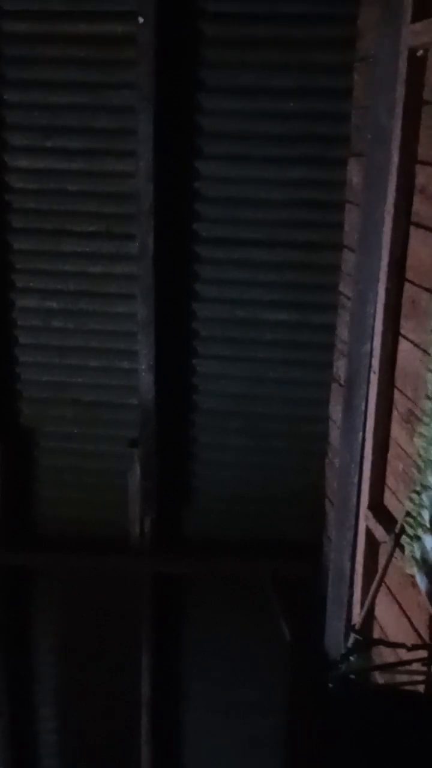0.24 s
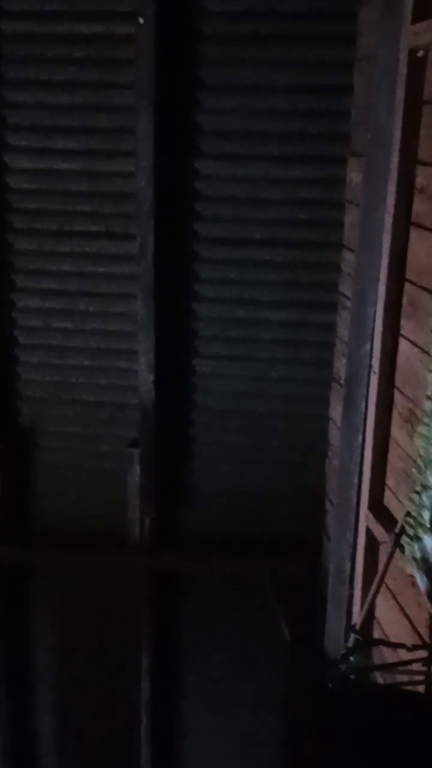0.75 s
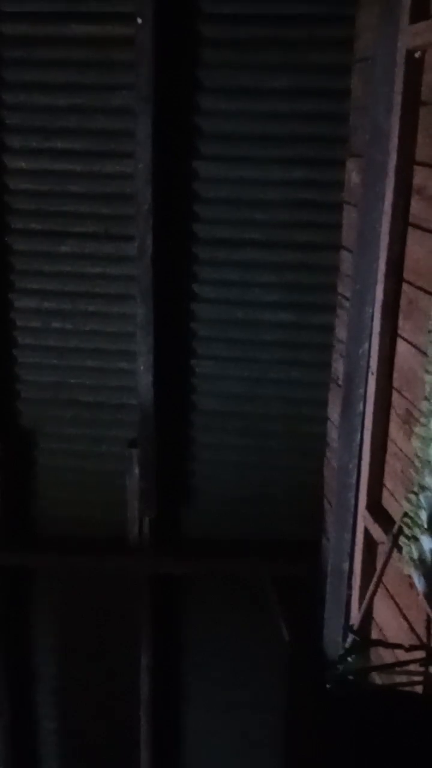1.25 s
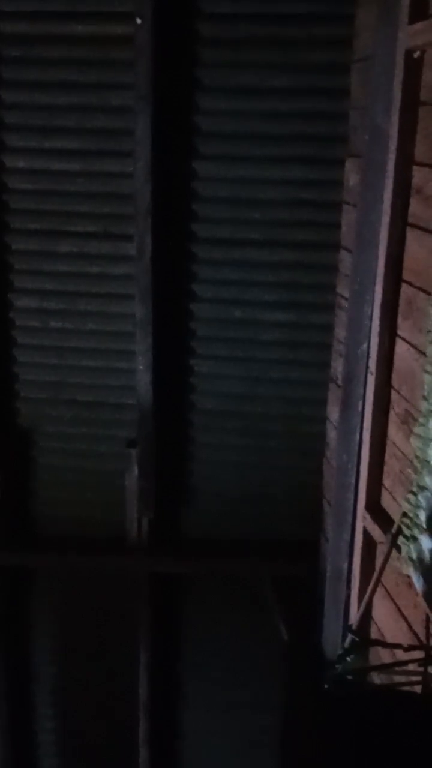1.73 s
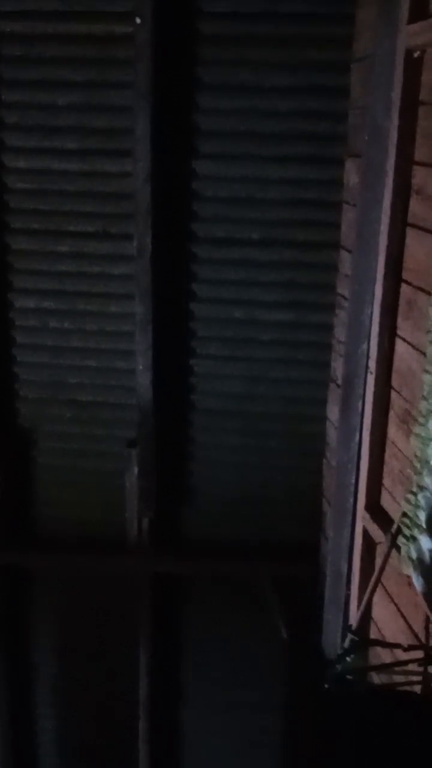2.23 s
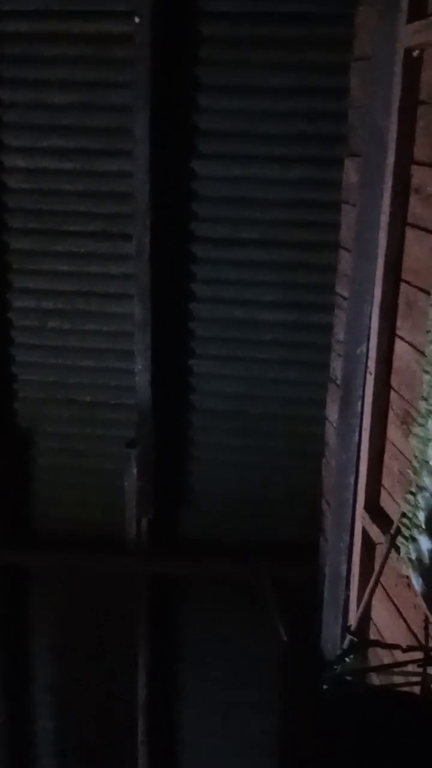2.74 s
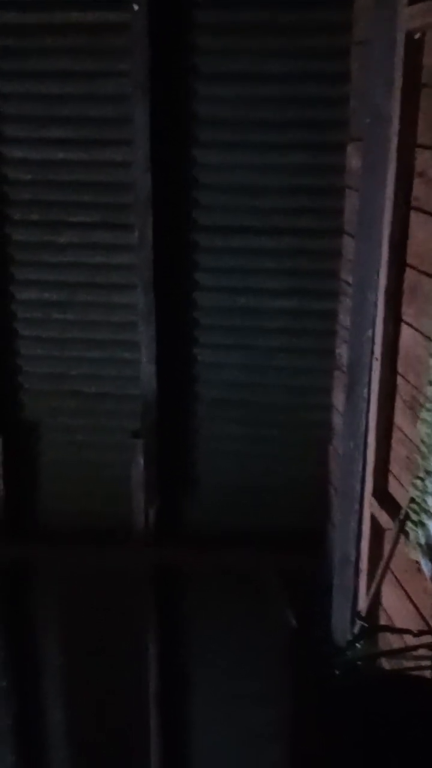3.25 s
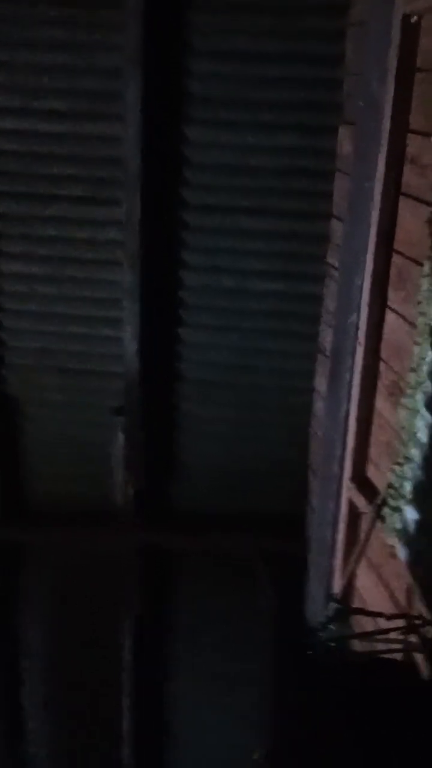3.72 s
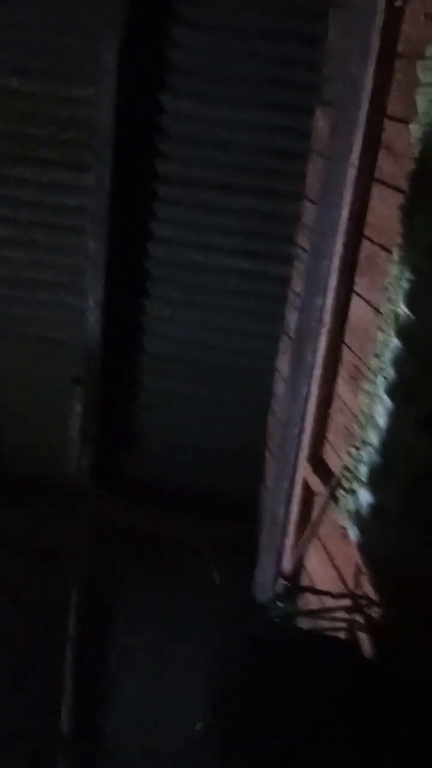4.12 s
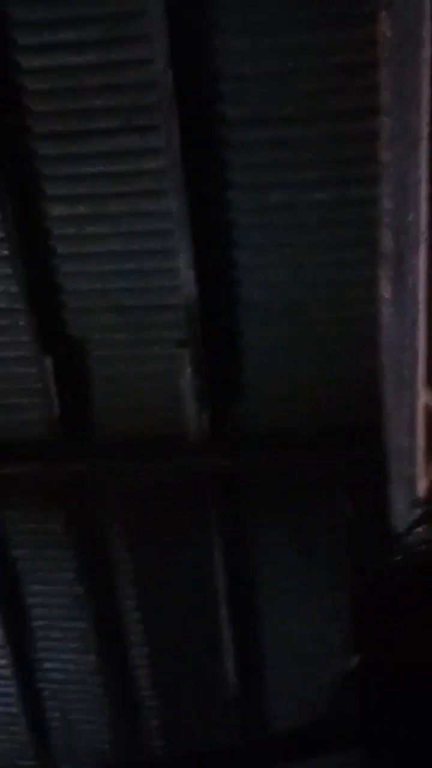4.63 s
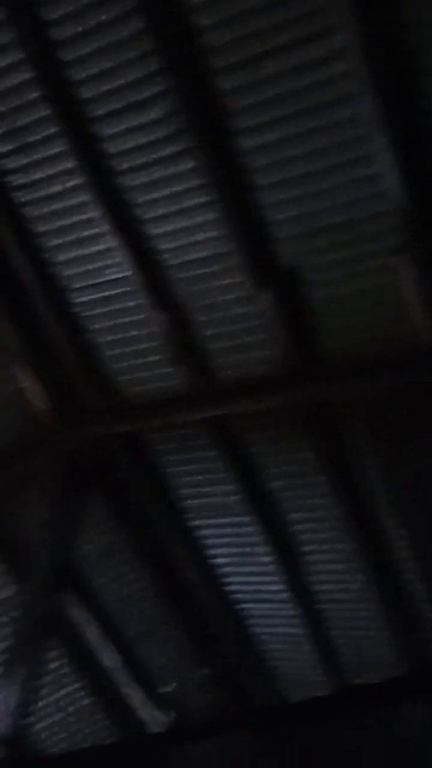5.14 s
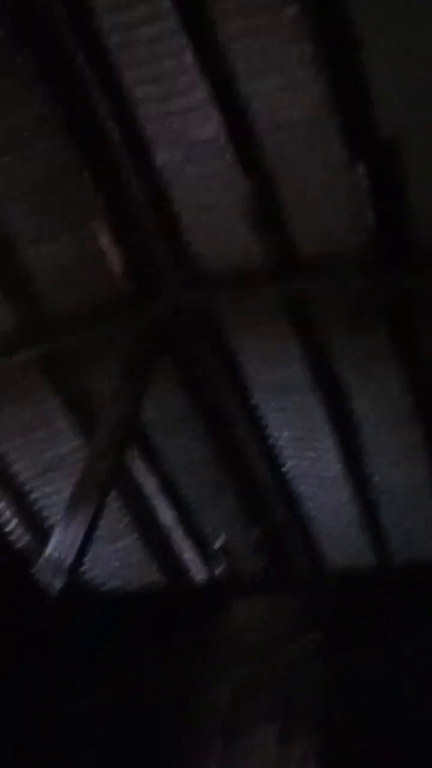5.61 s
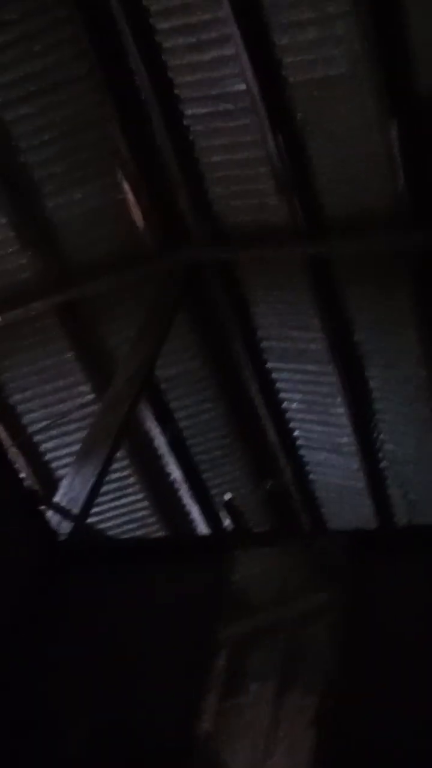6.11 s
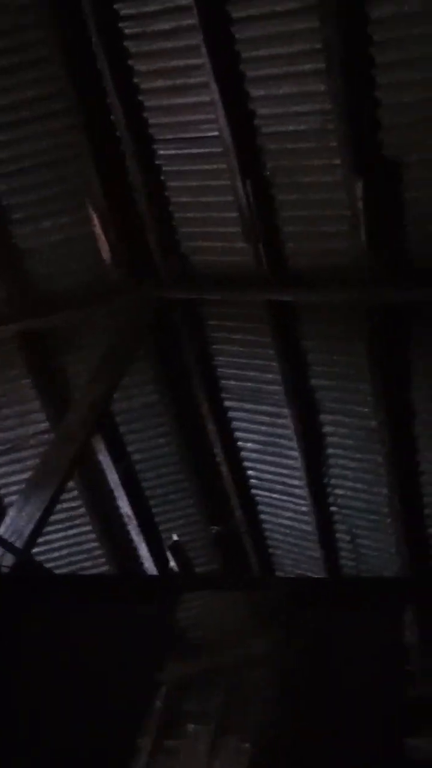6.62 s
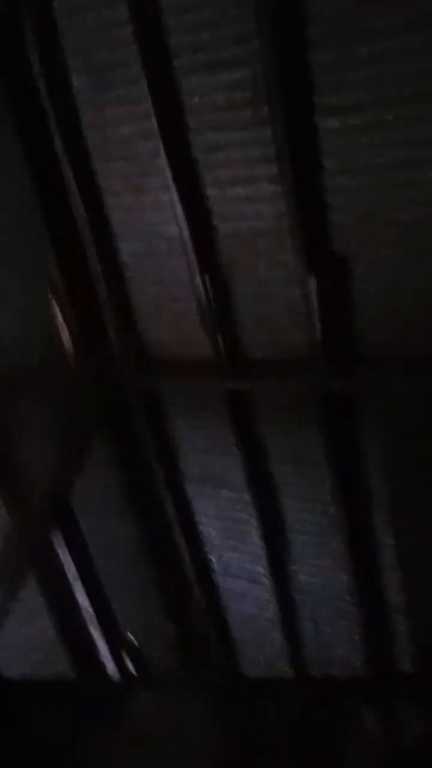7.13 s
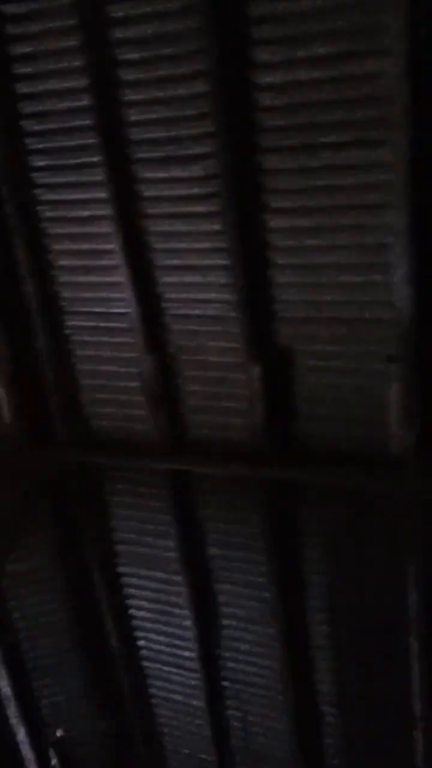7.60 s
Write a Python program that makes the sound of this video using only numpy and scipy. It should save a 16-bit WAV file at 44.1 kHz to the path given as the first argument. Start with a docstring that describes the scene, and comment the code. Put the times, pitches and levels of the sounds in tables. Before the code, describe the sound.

From inside an open shed, rain is heard pattering densely on the metal sheets overhead, so thick that it merges into one constant wash. A light ringing and a high splashing sizzle run through it, with a few faint hollow knocks and soft panel thuds half buried beneath. The rain never lets up, only thinning a little in tone as the microphone turns along the roof.

```python
"""Steady rain drums on a corrugated metal roof, heard from below in an open shed.
Thousands of drops a second hit the sheets, make the ribs ring briefly and splash;
the shed blurs them into an even hiss. Now and then a heavy drop knocks hollowly
or a roof panel gives a soft, low thud. Past the middle the microphone turns
along the roof, and the rain at once sounds slightly thinner."""
import sys
import numpy as np
from scipy import signal
from scipy.fft import rfft, irfft
from scipy.io import wavfile
from scipy.ndimage import map_coordinates

SR = 44100
rng = np.random.default_rng(int(sys.argv[2]) if len(sys.argv) > 2 else 0)


def unload_wav(signal):
    """Save mono or channel-first audio to the path in sys.argv[1] as 16-bit WAV at rate SR, clipped to [-1, 1]."""
    wavfile.write(
        sys.argv[1],
        SR,
        np.round(np.clip(np.atleast_2d(signal).T, -1, 1) * 32767).astype(np.int16),
    )


N = 346800
TIME = np.arange(N) / SR
FREQS = np.fft.rfftfreq(N, 1 / SR)

# How strongly the metal sheets answer a drop at each pitch: (f/Hz, level/dB)
SHEET_TONE = [(150, -57), (270, -24.5), (330, -17), (430, -13), (510, -4), (720, -1), (1200, 0),
              (1750, -1.5), (2050, -5), (2350, -10.5), (2600, -25.5), (2900, -40), (4000, -81)]


def drumming(drum_db, patter_db, hollow_db):
    """Drops hit the sheets: a bright patter and a hollow low sound, each swelling at random."""
    hits = shed_echo(drops(per_s=3500, spread_db=2.0), fade_s=0.22, echo_db=4)
    low, high = split(colour(hits, SHEET_TONE), hz=599)
    patter = shimmer(high, depth_db=1.47, patch_hz=80.0, patch_s=0.04)
    hollow = shimmer(low, depth_db=4.5, patch_hz=69.7, patch_s=0.08)
    dip_db = -9.5 * np.exp(-((TIME - 7.05) / 0.069) ** 2)  # the low sound dips once, briefly
    return (patter * undb(patter_db) + hollow * undb(hollow_db + dip_db)) * undb(drum_db)


# How strong the spray of bursting drops is at each pitch: (f/Hz, level/dB)
SPRAY_TONE = [(3000, -58), (4800, -31.5), (5400, -24.5), (6170, -23.5), (6370, -6.5), (6800, -2.5),
              (8750, -1.5), (9350, -7), (9900, -4.5), (11400, -11), (12200, -8), (13100, -7.5),
              (13800, -18), (15200, -10.5)]


def splashes(coarse_db, fine_db):
    """Bursting drops throw off a sizzle of tiny clicks; its highest part flutters more."""
    clicks = shed_echo(drops(per_s=5500, spread_db=1), fade_s=0.18, echo_db=11.5)
    sizzle = shimmer(colour(clicks, SPRAY_TONE), depth_db=1.0, patch_hz=140, patch_s=0.03)
    coarse, fine = split(sizzle, hz=10640)
    fine = shimmer(fine, depth_db=0.5, patch_hz=2510, patch_s=0.04)
    return coarse * undb(coarse_db) + fine * undb(fine_db)


# How strongly the ribs of the roof ring at each pitch: (f/Hz, level/dB)
RIB_TONE = [(2000, -26), (2500, 10), (2800, 0.5), (3250, 0), (3750, -0.5), (3950, -4), (4230, -14.5),
            (4350, -11.5), (4520, -17), (4800, -41), (6000, -80)]


def ringing(fade_s, swell_s, spread_db, wash_db, count=4500):
    """Each drop rings a rib at a pitch set by where it lands; the ring builds as it spreads."""
    length = SR // 6
    age = np.arange(length) / SR
    envelope = (1 - np.exp(-age / swell_s)) * np.exp(-np.log(1000) * age / fade_s)
    track = np.zeros(N + 2 * length)  # spare room at both ends
    sizes = undb(spread_db * np.clip(rng.standard_normal(count), -2, 1.5))
    for (when, where), size in zip(rng.random((count, 2)), sizes):
        start = int(when * (N + length))
        hz = 2300 + 2300 * where
        track[start:start + length] += size * envelope * np.sin(2 * np.pi * hz * age)
    pings = colour(track[length:length + N], RIB_TONE)
    wash = colour(rng.standard_normal(N), RIB_TONE)  # far parts of the roof blend together
    return shimmer(pings + undb(wash_db) * wash, depth_db=3.0, patch_hz=129.8, patch_s=0.05)


# How strongly whole panels rumble at each pitch as they bend: (f/Hz, level/dB)
PANEL_TONE = [(12, -35), (25, -15), (45, -22), (75, -1.5), (160, 3), (210, -1), (260, -2), (400, -5),
              (700, -70)]
# When a panel thuds, and its peak before thud_gain_db is added: (t/s, level/dB)
PANEL_THUDS = [(0.16, -56), (0.321, -54), (0.58, -57), (1.639, -61), (2.395, -51), (3.231, -60),
               (3.357, -59), (4.016, -55), (5.238, -58), (6.779, -57), (7.789, -56)]
# When a heavy drop knocks, and its peak before knock_gain_db is added: (t/s, level/dB)
DROP_KNOCKS = [(0.419, -40), (0.709, -38), (0.949, -40), (1.582, -36.5), (1.859, -38), (3.329, -40),
               (4.528, -36), (7.34, -37.5), (7.449, -44), (7.629, -38), (7.751, -41.5)]


def panels(rumble_db, thud_gain_db, knock_gain_db):
    """Whole panels rumble faintly in the rain, thud now and then and knock under heavy drops."""
    rumble = colour(drops(per_s=700, spread_db=4.5), PANEL_TONE) * undb(rumble_db)
    thuds = blows(PANEL_THUDS, low_hz=58, high_hz=122, swell_s=0.024) * undb(thud_gain_db)
    knocks = blows(DROP_KNOCKS, low_hz=370, high_hz=503, swell_s=0.022) * undb(knock_gain_db)
    return rumble + thuds + knocks


def blows(table, low_hz, high_hz, swell_s):
    """Each blow shakes a panel at many close pitches, which swell to a peak and die away."""
    band = signal.butter(3, [low_hz, high_hz], "bandpass", fs=SR, output="sos")
    shaking = unit(signal.sosfilt(band, rng.standard_normal(N)))
    envelope = np.zeros(N)
    for start_s, db in table:
        age = np.maximum(TIME - start_s, 0) / swell_s
        envelope += undb(db) * age * np.exp(1 - age)
    return shaking * envelope


def drops(per_s, spread_db):
    """Drops land at random moments, each a single click of random size."""
    lands = rng.random(N) < per_s / SR
    size = undb(spread_db * np.clip(rng.standard_normal(N), -2, 2))
    return lands * size * rng.choice([-1, 1], N)


def shed_echo(hits, fade_s, echo_db):
    """Add echoes that fall 60 dB in fade_s; every drop lands elsewhere, so no two are alike."""
    keep = np.exp(-2 * np.log(1000) / (fade_s * SR))  # share of energy left after one sample
    energy, _ = signal.lfilter([1 - keep], [1, -keep], hits ** 2, zi=[keep * np.mean(hits ** 2)])
    echoes = np.sqrt(energy) * rng.standard_normal(N)
    return unit(hits) + undb(echo_db) * unit(echoes)


def shimmer(x, depth_db, patch_hz, patch_s):
    """Make neighbouring pitches swell and fade together in random patches."""
    _, _, spectra = signal.stft(x, SR, nperseg=1024, noverlap=768)
    hz = np.linspace(0, SR / 2, spectra.shape[0])
    seconds = np.linspace(0, N / SR, spectra.shape[1])
    grid = np.meshgrid(hz / patch_hz, seconds / patch_s, indexing="ij")
    patches = map_coordinates(rng.standard_normal((300, 300)), grid, order=1, mode="mirror")
    _, sound = signal.istft(spectra * undb(depth_db * unit(patches)), SR, nperseg=1024, noverlap=768)
    return unit(sound[:N])


def colour(x, tone):
    """Make each pitch as strong as a tone table says, then scale the sound to strength 1."""
    hz, db = np.transpose(tone)
    gain = undb(np.interp(np.log(np.maximum(FREQS, 1)), np.log(hz), db))
    return unit(irfft(rfft(x) * gain, N))


def split(x, hz):
    """The parts below and above a pitch, each scaled to strength 1."""
    low = irfft(rfft(x) / (1 + (FREQS / hz) ** 20), N)
    return unit(low), unit(x - low)


def undb(db):
    """Turn decibels into a number to multiply by."""
    return 10 ** (np.asarray(db) / 20)


def unit(x):
    """Scale a sound to an average strength (rms) of 1."""
    return x / np.sqrt(np.mean(x ** 2))


# Pitch ranges that get weaker when the microphone turns: (f/Hz, width/Hz, level/dB)
WEAKER_RANGES = [(720, 140, -2), (3900, 320, -5)]


def microphone_turn(x, at_s):
    """The microphone turns along the roof: the sound switches to a slightly thinner tone."""
    cut_db = sum(db * np.exp(-((FREQS - hz) / width) ** 2) for hz, width, db in WEAKER_RANGES)
    thinner = irfft(rfft(x) * undb(cut_db), N)
    return np.where(TIME > at_s, thinner, x)


# How loud the drumming and splashes sound, dipping slightly as the microphone turns away.
# Only a level's distance from its column's average counts: (t/s, drumming level/dB, splash level/dB)
RAIN_LOUDNESS = [(0.3, -35, -52.5), (0.5, -35, -52.5), (0.87, -35, -52.5), (5.39, -35, -52.5),
                 (6.07, -35.5, -54), (7.7, -35.5, -53)]


def scene():
    """The whole roof; drumming, spray and ringing dip slightly as the microphone turns away."""
    times, *levels = np.transpose(RAIN_LOUDNESS)
    drum_db, splash_db = (np.interp(TIME, times, db - np.mean(db)) for db in levels)
    sheets = drumming(drum_db, patter_db=-34.5, hollow_db=-49.5)
    ribs = ringing(fade_s=0.12, swell_s=0.0067, spread_db=2.5, wash_db=-3) * undb(-55.5 + drum_db)
    spray = splashes(coarse_db=-53 + splash_db, fine_db=-58 + 1.9 * splash_db)
    bumps = panels(rumble_db=-64, thud_gain_db=-4.5, knock_gain_db=-9.0)
    return microphone_turn(sheets + ribs + spray + bumps, at_s=5.2)[None]


def record(dry, top_hz=15450):
    """The phone cuts off the very highest pitches."""
    return signal.sosfilt(signal.ellip(12, 0.1, 70, top_hz, fs=SR, output="sos"), dry)


dry = scene()
out = record(dry)
unload_wav(out)
```